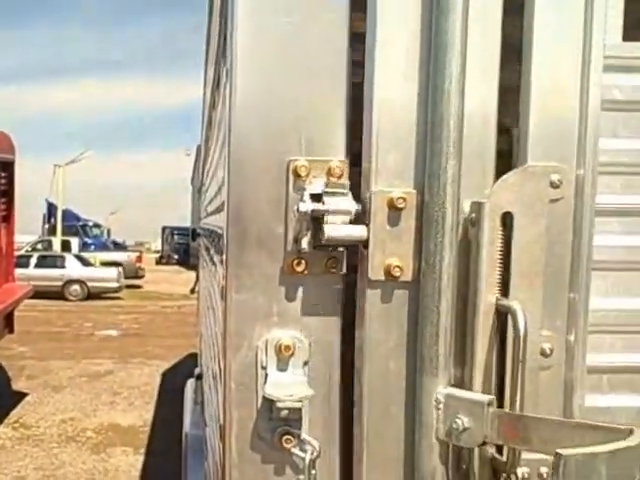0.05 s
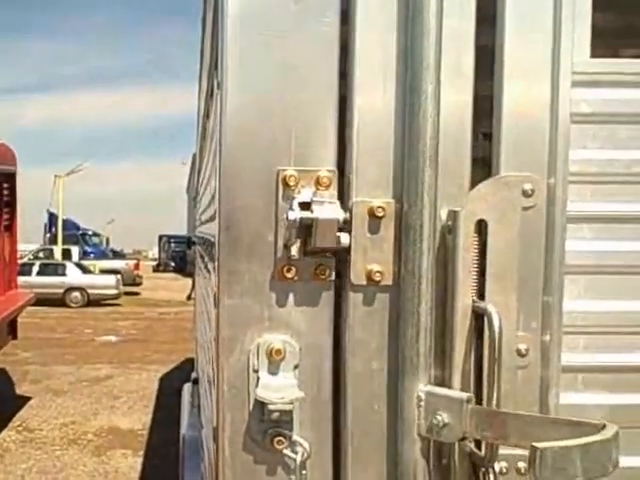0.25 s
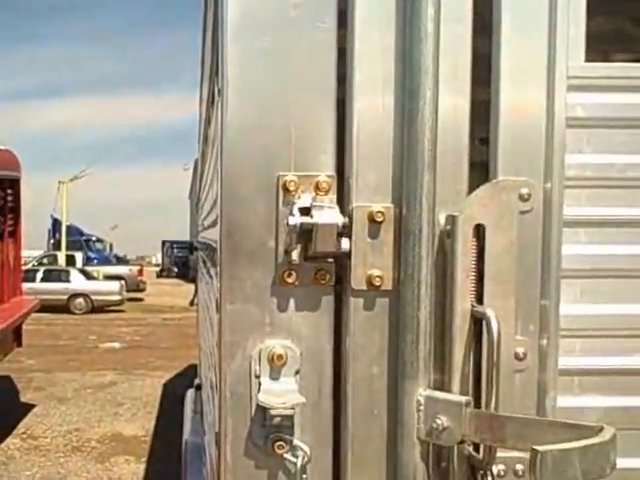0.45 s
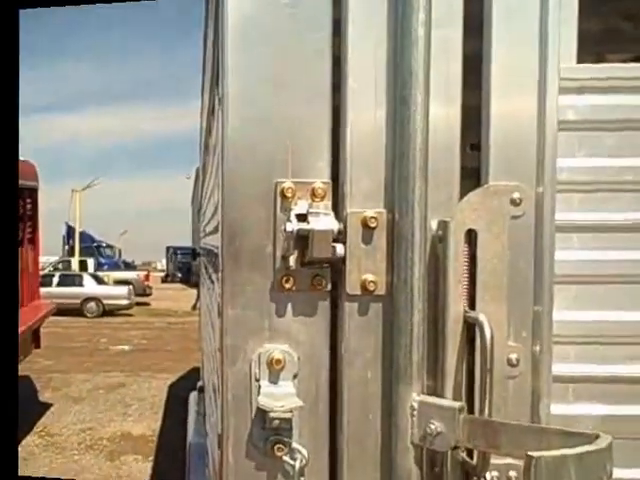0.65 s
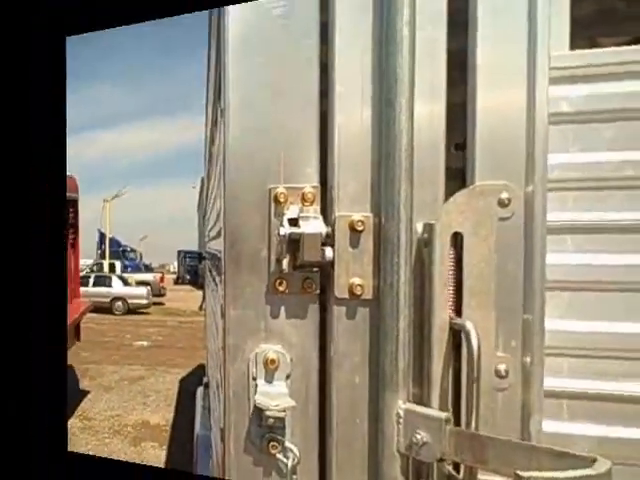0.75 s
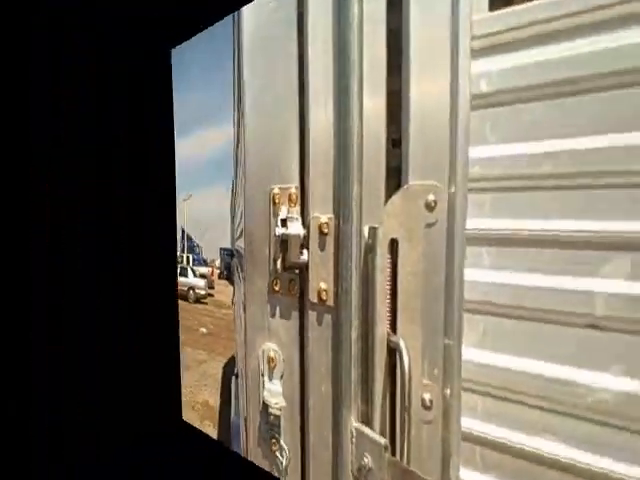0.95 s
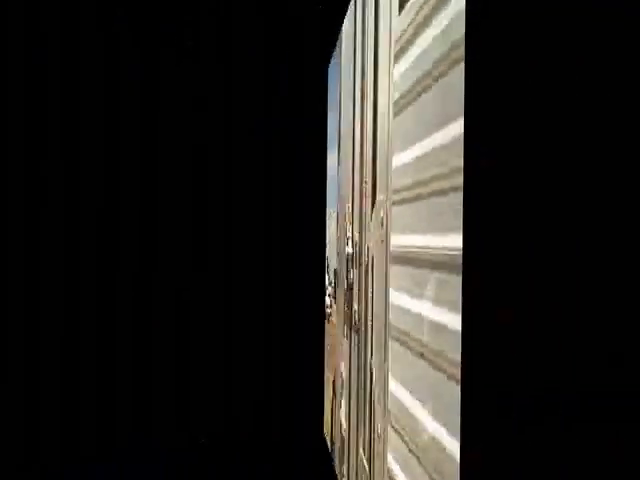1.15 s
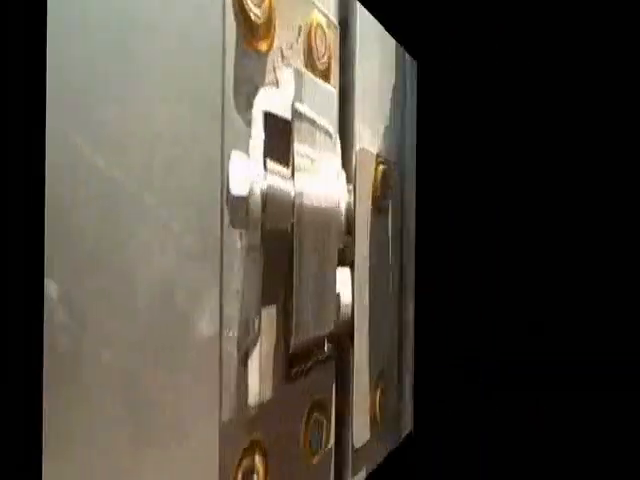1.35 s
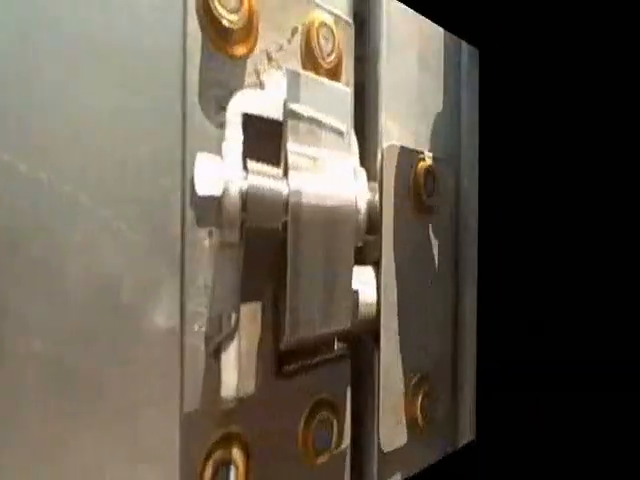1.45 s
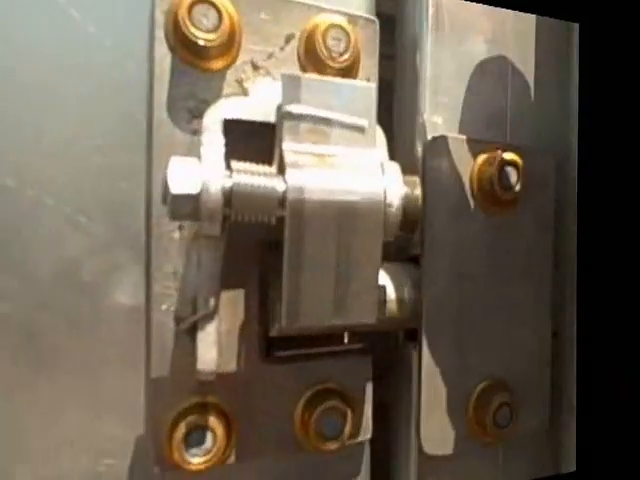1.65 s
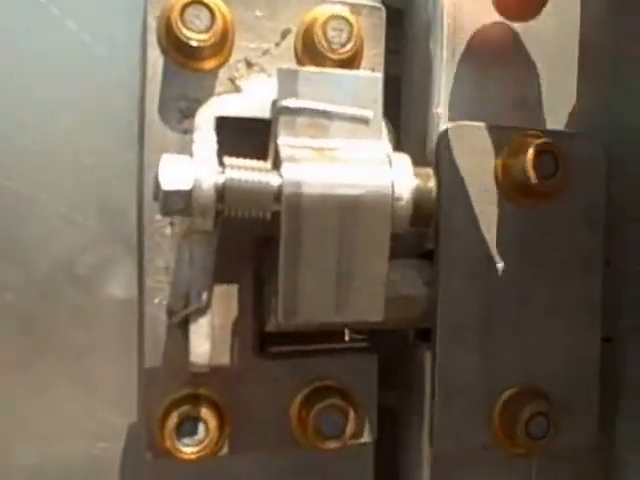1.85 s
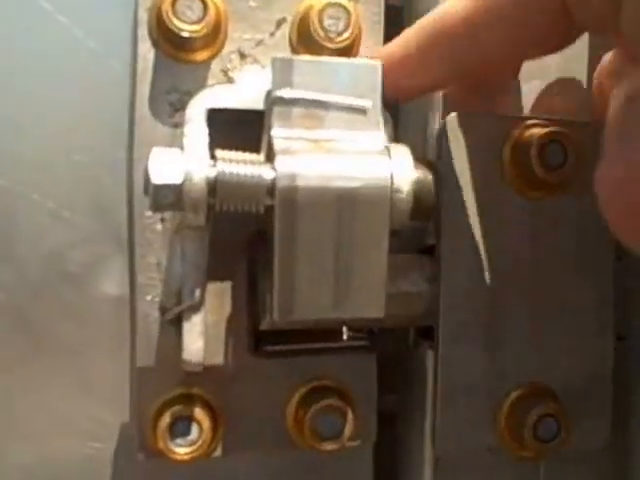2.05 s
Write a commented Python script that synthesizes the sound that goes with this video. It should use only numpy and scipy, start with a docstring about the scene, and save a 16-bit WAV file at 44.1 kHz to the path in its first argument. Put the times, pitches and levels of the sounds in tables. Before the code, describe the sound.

A metal trailer door slams shut with a latch clack, then rattles briefly outdoors.

```python
"""In an open yard, close by, an aluminium trailer door is slammed. The latch bolt clacks on its catch,
then the door bangs into the frame, loud enough to overload the microphone. The trailer body booms,
wall panels knock and the loose locking handle rattles for a second as the shaking dies away.
Each part sounds because short blows set it ringing. Faint wind and a far idling engine lie underneath."""
import sys
import numpy as np
from scipy import signal
from scipy.fft import rfft, irfft
from scipy.io import wavfile
from scipy.ndimage import uniform_filter1d

SR = 44100
rng = np.random.default_rng(int(sys.argv[2]) if len(sys.argv) > 2 else 0)


def to_wav(s):
    """Save 16-bit WAV."""
    ch = np.atleast_2d(s).T  # columns
    pcm = np.round(np.clip(ch, -1, 1) * 32767)  # PCM
    wavfile.write(sys.argv[1], SR, pcm.astype(np.int16))


N = 92610
T = np.arange(N) / SR
HZ = np.maximum(np.arange(N // 2 + 1) * SR / N, 1)


def undb(db):
    """Turn decibels into a number to multiply a sound by."""
    return 10 ** (np.asarray(db) / 20)


def unit(x):
    """Scale a sound to an average power of 1."""
    return x / np.sqrt(np.mean(x ** 2))


def curve(rows):
    """A volume that glides through (seconds, dB) points."""
    return undb(np.interp(T, *np.array(rows).T))


def fade(seconds):
    """A ring dying away: it falls 60 dB in the given time."""
    return np.exp(-np.minimum(np.log(1000) * T / max(seconds, .002), 40))


def noise(points):
    """Noise whose balance of bass and treble follows (Hz, dB) points."""
    hz, db = np.array(points).T
    colour = undb(np.interp(np.log(HZ), np.log(hz), db))
    return unit(irfft(rfft(rng.standard_normal(N)) * colour, N))


def drift(per_second):
    """A slow random wander, mostly between -1 and 1."""
    steps = rng.standard_normal(64)[(T * per_second).astype(int) % 64]
    return 1.3 * uniform_filter1d(steps, int(SR / per_second))


def ring(colour, ring_s, damping, tail_db, tail_s):
    """A blur of many tones after a blow, with a long, quiet tail. The times hold at 1000 Hz."""
    spectrum, out = rfft(noise(colour)), np.zeros(N)
    centres = np.geomspace(125, 16000, 8)
    for hz, pick in zip(centres, np.eye(len(centres))):
        band = irfft(spectrum * np.interp(np.log(HZ), np.log(centres), pick), N)
        stretch = (hz / 1000) ** -damping  # treble dies sooner than bass
        out += band * (fade(ring_s * stretch) + undb(tail_db) * fade(tail_s * stretch))
    return out


def tones(notes, scatter_db=0):
    """Clear tones fading after a blow; scatter_db varies their strength, as hitting a new spot would."""
    out = np.zeros(N)
    for hz, db, ring_s in notes:
        gain = undb(db + scatter_db * rng.standard_normal())
        out += gain * np.sin(2 * np.pi * (hz * T + rng.random())) * fade(ring_s)
    return out


def blows(hits, pivot_hz):
    """The force of metal hitting metal. Brightness lifts the sound above pivot_hz and lowers it below."""
    size = 8192
    force, hz = np.zeros(N + size), np.arange(size // 2 + 1) * SR / size
    octaves = np.clip(np.log2(np.maximum(hz, 1) / pivot_hz), -3, 3)
    for start, db, contact_ms, brightness in hits:
        window = np.exp(-T[:size] * 1000 / max(contact_ms, .3))
        spectrum = rfft(rng.standard_normal(size) * window)
        burst = irfft(spectrum / np.abs(spectrum) * undb(db + brightness * octaves))
        i = int(start * SR)
        force[i:i + size // 2] += burst[:size // 2]
    return force[:N]


def strike(force, body):
    """Every push of the force starts the body's ring anew."""
    return signal.fftconvolve(force, body)[:N]


def wind():
    """Light wind over the yard: a low, wavering rush."""
    # The wind's colour. Each row: pitch in Hz, relative level in dB.
    colour = [(20, -9.5), (55, -8.5), (100, -16.5), (170, -18), (270, -18), (400, -21), (950, -23.5),
              (2100, -37), (5000, -48), (9000, -56), (15500, -55.5)]
    # Its slow rise and fall. Each row: time in seconds, level in dB.
    levels = [(0, -41.5), (1.6, -43.5), (2.1, -40.5)]
    return noise(colour) * curve(levels) * undb(drift(14))


def engine():
    """A far idling engine drones, its speed wandering a little."""
    # The engine's hum. Each row: pitch in Hz, full level in dB.
    notes = [(130.7, -38), (246, -57)]
    uneven_time = np.cumsum(1 + .003 * drift(2.7)) / SR
    drone = sum(undb(db) * np.sqrt(2) * np.sin(2 * np.pi * hz * uneven_time) for hz, db in notes)
    return drone * undb(-7 * np.maximum(1 - T, 0))  # swells by 7 dB over the first second


def post():
    """A hollow wall post bonks as the trailer sways."""
    # Knocks. Each row: start in seconds, level in dB, contact in ms, brightness in dB per octave.
    hits = [(0.955, -28.5, 22, 3.5), (1.0865, -23, 4, -1), (1.228, -23, 10, 0)]
    # The post's blur of weak tones. Each row: pitch in Hz, relative level in dB.
    colour = [(200, -18), (500, -32), (630, -8.5), (760, -10.5), (950, -38), (1900, -12), (4000, -37),
              (15000, -54)]
    # Its clear tones. Each row: pitch in Hz, relative level in dB, ring time in seconds.
    notes = [(630, -3, .26), (700, -9, .11), (764, 0, .42)]
    body = ring(colour, ring_s=0.13, damping=0.17, tail_db=-10.5, tail_s=0.55)
    body += undb(-6.5) * tones(notes)
    return strike(blows(hits, pivot_hz=730), body)


def sheet():
    """The ring of one wall sheet: all are built alike, but no two sound quite the same."""
    # The sheet's blur of tones. Each row: pitch in Hz, relative level in dB.
    colour = [(90, -13.5), (240, 0), (450, -7.5), (740, -5), (900, -5), (1350, -5), (1950, -2.5),
              (2700, -12), (3250, -4.5), (3900, -13.5), (6500, -22.5), (9000, -34), (15000, -49.5)]
    # Its clear tones. Each row: pitch in Hz, relative level in dB, ring time in seconds.
    notes = [(1045, -2, 0.65), (1503, -2, 0.23), (1940, -0.5, 0.31), (2040, 2, .26), (2420, -6, 0.61),
             (3135, -15.5, 0.2), (3650, -16.5, 0.15), (4600, -14, 0.18)]
    blur = ring(colour, ring_s=.125, damping=0.76, tail_db=-11.5, tail_s=0.64)
    return blur + undb(-14.5) * tones(notes, scatter_db=3)


def panels(count=3, taps_per_second=210):
    """Wall sheets knock on their posts in turn, with finer chatter in between."""
    # Knocks. Each row: start in seconds, level in dB, contact in ms, brightness in dB per octave.
    hits = [(0.961, -25.5, 4.3, 4.5), (0.986, -26, 20, -0.5), (1.1065, -19.5, 3.4, 3),
            (1.152, -23, 6.9, 0.5), (1.164, -18, 5.7, 2.5), (1.229, -23.5, 44, 0), (1.282, -25.5, 6.4, 0.5),
            (1.403, -34, 5.4, 1), (1.423, -35, 5, 1), (1.505, -32.5, 7.4, 2)]
    # How hard the shaking makes loose sheets chatter. Each row: time in seconds, level in dB.
    shaking = [(0.34, -23.5), (0.45, -23), (0.6, -24.5), (0.72, -27), (0.9, -37), (0.99, -27.5),
               (1.07, -28.5), (1.15, -38), (1.29, -30), (1.36, -38), (1.5, -41.5), (1.6, -75)]
    knocks = sum(strike(blows(hits[k::count], pivot_hz=2000), sheet()) for k in range(count))
    body = sheet()
    taps = (rng.random(N) < taps_per_second / SR) * np.sign(rng.standard_normal(N))
    taps = unit(taps) / np.sqrt(np.sum(body ** 2))  # so the shaking alone sets the level
    chatter = taps * curve(shaking) * (T > shaking[0][0])
    return knocks + strike(chatter, body)


def handle():
    """The loose handle bounces in its holder, landing on a new spot each time, so each chink differs."""
    # Bounces. Each row: start in seconds, level in dB, contact in ms, brightness in dB per octave.
    hits = [(0.559, -23.5, 6.5, 4.5), (0.654, -22, 2.8, -1.5), (0.753, -16, 3.3, 1),
            (0.8262, -24, 2.5, -2.5), (0.9195, -23, 3.3, -0.5), (0.983, -25, 10, -5),
            (1.017, -24, 7.6, -0.5), (1.147, -24, 16, -2.5), (1.2, -29, 11, -1)]
    # The handle's blur of tones. Each row: pitch in Hz, relative level in dB.
    colour = [(200, -1.5), (1000, -15), (2100, 4.5), (4000, -4.5), (5500, -1), (7200, -16), (7950, 3.5),
              (8600, -7.5), (9500, -17), (13000, -16.5), (16000, -22)]
    # Its clear tones. Each row: pitch in Hz, relative level in dB, ring time in seconds.
    notes = [(2083, 1, .18), (2310, -4, .12), (3270, -6, .12), (3515, -4, .12), (5000, -5, .14),
             (5920, -8, .1), (7915, -15, .2), (8075, -14, .2), (8260, -18, .2), (8570, -14, .18)]
    blur = ring(colour, ring_s=0.12, damping=0.047, tail_db=-23, tail_s=0.62)
    out = np.zeros(N)
    for hit in hits:
        force = blows([hit], pivot_hz=4880)
        out += strike(force, blur + undb(-12) * tones(notes, scatter_db=3))
    return out


def ticks():
    """The bolt shoots home with a dry crack; afterwards small metal parts settle with ticks."""
    # Ticks. Each row: start in seconds, level in dB, contact in ms, brightness in dB per octave.
    hits = [(0.3318, 3.5, 1.8, 4.5), (0.5145, -16, 1.1, 5.5), (1.0565, -23, 2.6, -2.5),
            (1.426, -43.5, 0.87, 11.5), (1.489, -43.5, 3.1, -9), (1.6685, -55, 2.3, -13.5),
            (1.735, -53, 2.7, 2)]
    # Their colour. Each row: pitch in Hz, relative level in dB.
    colour = [(500, -41), (2500, 5), (6000, 6), (9500, -4.5), (13000, -3), (16000, -12)]
    body = ring(colour, ring_s=0.028, damping=0.18, tail_db=-17, tail_s=0.4)
    return strike(blows(hits, pivot_hz=5880), body)


def latch():
    """The free bolt pings on its catch, then snaps home and rebounds with its ring muffled."""
    # Bolt strikes. Each row: start in seconds, level in dB, contact in ms,
    # brightness in dB per octave, extra level of the ping in dB.
    hits = [(0.2323, -4.5, 0.68, -1.5, 1), (0.3083, -9, 3.7, -2.5, -8.5), (0.322, -9.5, 1.1, 2, -23),
            (0.3314, -3, 1.9, 3.5, -16.5), (0.38, -8, 3.5, 1.5, -14.5), (0.387, -14.5, 0.92, -8.5, -19.5)]
    # The latch's blur of tones. Each row: pitch in Hz, relative level in dB.
    colour = [(80, -43.5), (250, -18.5), (600, -11.5), (1400, -3), (3000, 3), (5500, 1.5), (7500, -0.5),
              (10000, -3.5), (12500, -5), (15500, 0.5)]
    # The bolt's clear tones. Each row: pitch in Hz, relative level in dB, ring time in seconds.
    notes = [(1061, -15, .4), (1327, -13, .3), (1432, -9, .3), (1858, -12, .23), (2083, -15, .25),
             (3100, -13, .2), (3800, -3, .12), (4430, -10, .13), (5270, -3, .06), (5420, 7, .08),
             (7890, -9, .1), (11830, -5, .07), (12850, -5, .07), (13450, -5, .07), (15030, -2, .06),
             (15220, -2, .07), (15480, -2, .06)]
    clack_hits = [hit[:4] for hit in hits]
    ping_hits = [(start, db + ping_db, ms, brightness) for start, db, ms, brightness, ping_db in hits]
    body = ring(colour, ring_s=0.2, damping=0.66, tail_db=-12.5, tail_s=1.0)
    clacks = strike(blows(clack_hits, pivot_hz=4060), body)
    pings = strike(blows(ping_hits, pivot_hz=4000), undb(-9) * tones(notes))
    return clacks + pings


def frame():
    """The door's edge clangs on the frame and rebounds against it."""
    # Clangs. Each row: start in seconds, level in dB, contact in ms, brightness in dB per octave.
    hits = [(0.3245, 4, 2, 0), (0.46, -14.5, 4.4, 1.5), (0.548, -16, 6, -1), (0.6208, -15, 1.07, 2.5),
            (0.703, -36, 2.5, 2.5), (0.838, -24, 13.4, -3.5)]
    # The frame's blur of tones. Each row: pitch in Hz, relative level in dB.
    colour = [(60, -28), (250, -8), (700, -3.5), (1200, -5), (1900, 0), (3000, -2), (4700, -8), (6500, -11),
              (9000, -22.5), (15500, -31.5)]
    # Its clear tones. Each row: pitch in Hz, relative level in dB, ring time in seconds.
    notes = [(1566, -0.5, 0.36), (1834, -1, 0.62), (1980, -3.5, 0.5), (2285, -1.5, .45), (2765, -3.5, 0.37),
             (2880, -6, 0.59), (2820, -5, 0.55), (3117, -3, 0.39), (4494, -4, .12), (5160, -10, .18)]
    body = ring(colour, ring_s=0.14, damping=0.23, tail_db=-21, tail_s=0.96)
    body += undb(-20.5) * tones(notes)
    return strike(blows(hits, pivot_hz=2000), body)


def door():
    """The door bangs shut and the trailer body booms and rocks."""
    # Bangs. Each row: start in seconds, level in dB, contact in ms, brightness in dB per octave.
    hits = [(0.335, -7.5, 16, -1), (0.354, -14.5, 10.6, 0.5), (0.388, -15, 4.7, 0), (0.54, -18.5, 20, -1.5),
            (0.617, -17, 10.7, -2.5), (0.755, -31, 33, 2.5), (0.89, -27, 15, -4), (1.105, -22, 8.9, -3),
            (1.185, -32, 5.6, -0.5), (1.305, -30, 9.4, -1.5)]
    # The boom's blur of tones. Each row: pitch in Hz, relative level in dB.
    colour = [(20, -9.5), (45, -2.5), (90, -5), (160, 3), (230, 4), (350, -1.5), (520, -5), (700, -3),
              (1300, -10.5), (2500, -12.5), (6000, -27), (15000, -27)]
    # Its clear tones. Each row: pitch in Hz, relative level in dB, ring time in seconds.
    notes = [(43, -11, 1.4), (60.4, -7, 1.38), (78.7, -5.5, 1.1), (100.6, 0, 1.1), (158, -6, 1.1),
             (190, -.5, 1.5), (283, 1, 1.1), (346, 0, .7), (451, 9.5, .6), (533, 1, .35), (641, 3, .7),
             (660, 3, .35), (724, 2, .45), (806, 2, .55), (953, -9, .6)]
    body = ring(colour, ring_s=0.27, damping=0.41, tail_db=-19.5, tail_s=0.96)
    body += undb(-12.5) * tones(notes)
    return strike(blows(hits, pivot_hz=184), body)


def scene():
    """All parts of the trailer over the wind and the engine, in one channel."""
    trailer = latch() + door() + frame() + panels() + post() + handle() + ticks()
    return (trailer + wind() + engine())[None]


def record(dry, top_hz=15750):
    """The microphone overloads on the bang, flattening its peaks, and cuts the highest treble."""
    treble_cut = signal.ellip(10, .2, 70, top_hz, fs=SR, output="sos")
    return signal.sosfilt(treble_cut, np.clip(dry, -1, 1))


dry = scene()
out = record(dry)
to_wav(out)
```